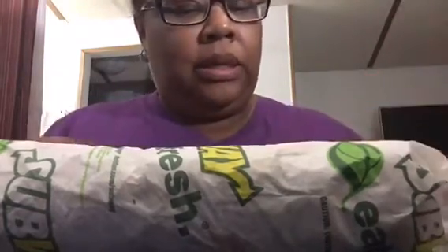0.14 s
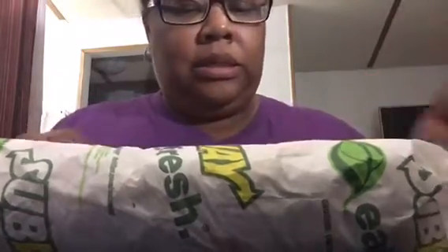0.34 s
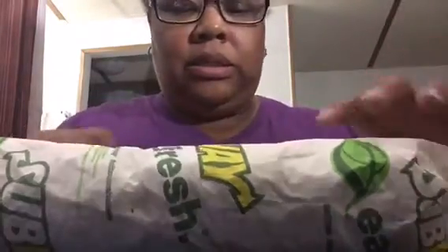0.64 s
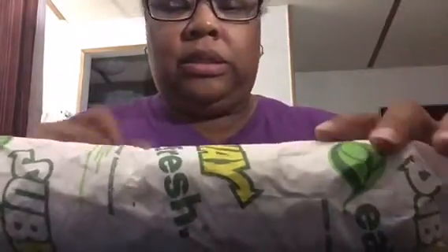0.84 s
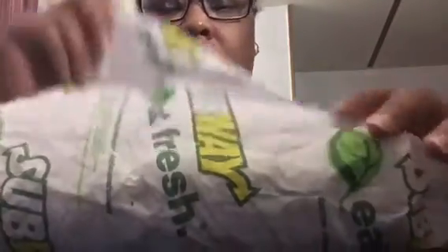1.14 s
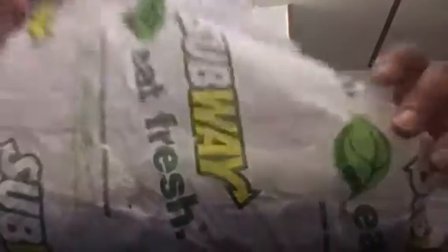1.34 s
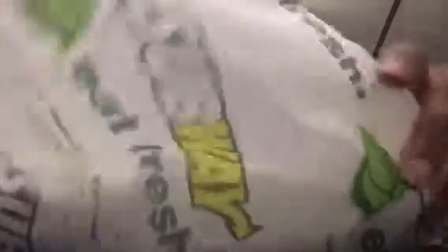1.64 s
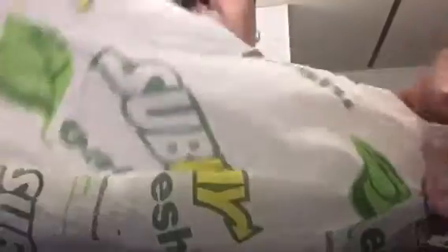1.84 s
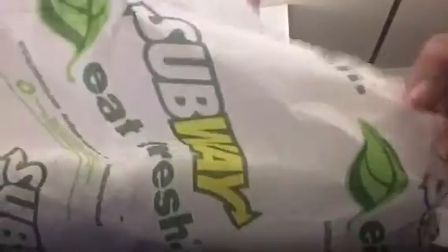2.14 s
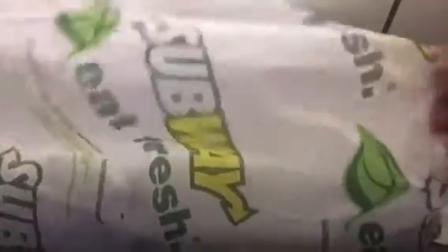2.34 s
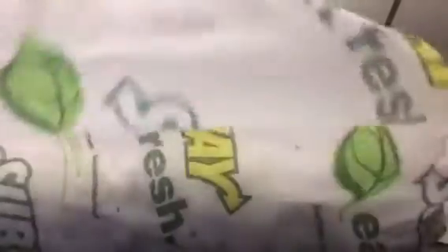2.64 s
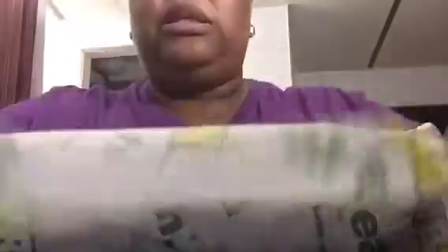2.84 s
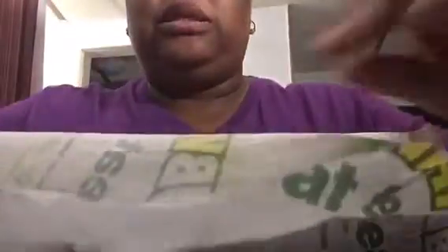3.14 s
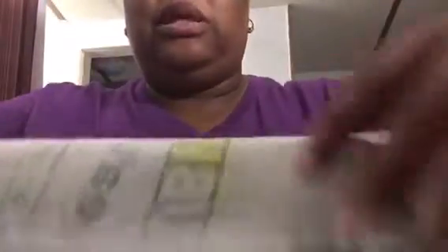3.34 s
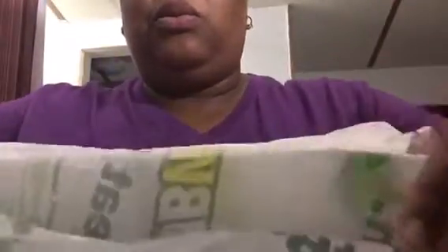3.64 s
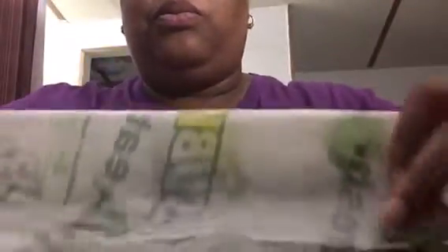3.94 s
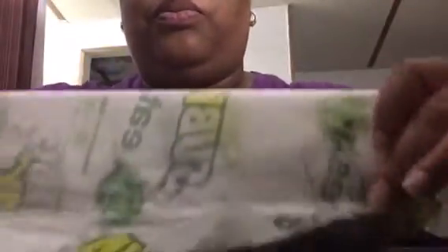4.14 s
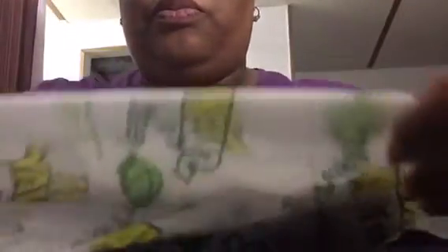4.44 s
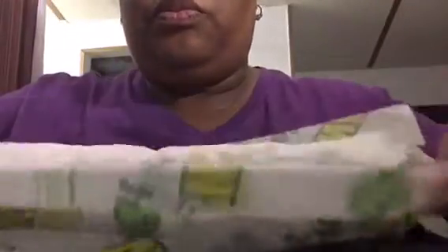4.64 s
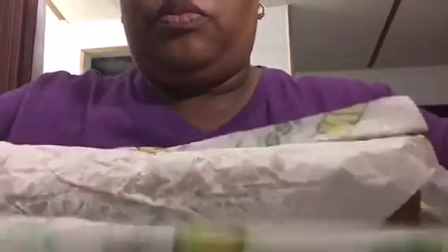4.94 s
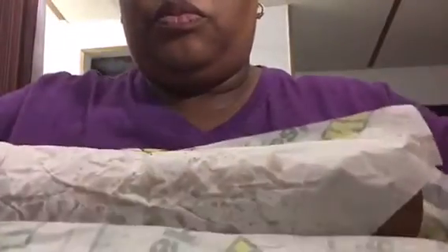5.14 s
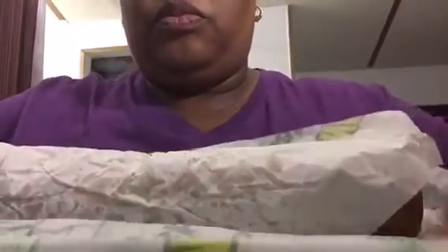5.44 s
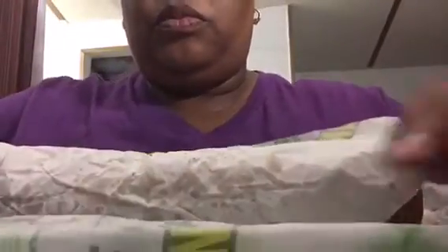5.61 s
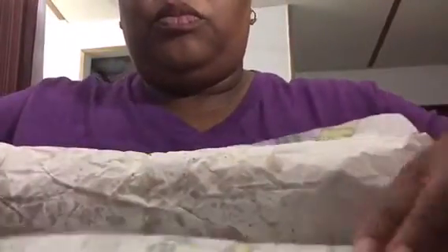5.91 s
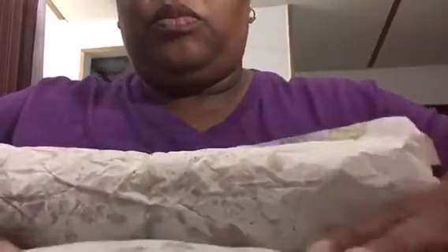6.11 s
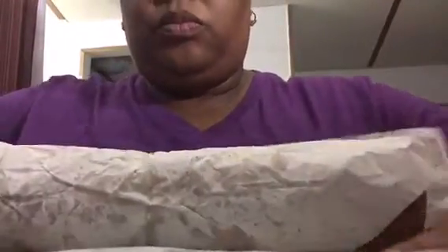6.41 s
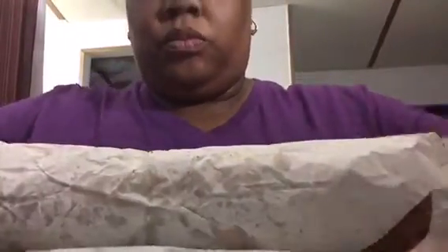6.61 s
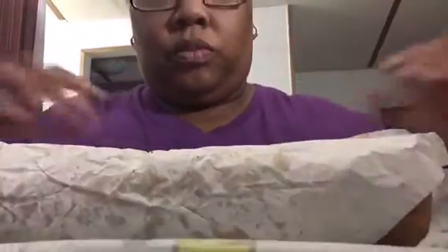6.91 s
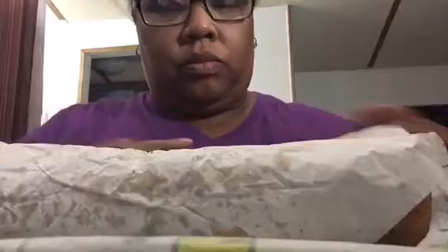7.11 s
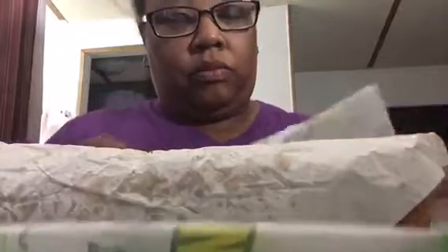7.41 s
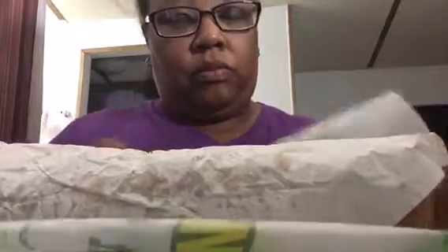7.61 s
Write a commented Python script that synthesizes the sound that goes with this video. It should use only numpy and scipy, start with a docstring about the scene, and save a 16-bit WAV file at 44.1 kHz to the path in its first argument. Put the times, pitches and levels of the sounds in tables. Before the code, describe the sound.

Paper wrapper handling, close and dry with a short small-room reflection: light rustling at first, growing into loud, dense crinkles with crisp ticks and snapping creases. Soft thuds of hands and sandwich come between. The bursts are uneven, with brief lulls, almost stopping near the end, before a few scraping, rustling strokes flatten the sheet on the table. A faint low mains hum and room rumble continue throughout.

```python
"""A sandwich is unwrapped by hand on a table in a small room, close to the microphone, over hum and rumble.
First the paper drags under the roll; then each move of the hands rustles, as swarms of tiny buckles
and flipping facets. Bumps thud as damped swings, creases tick and crackle, panels pop and ring.
After 6.5 s the handling thins and grows faint; from about 7.2 s the paper is smoothed flat on the table.
Short reflections off table and paper and a longer, fainter tail from the walls, all slightly dulled, surround it."""
import sys
import numpy as np
from scipy import signal
from scipy.fft import rfft, irfft
from scipy.io import wavfile
from scipy.ndimage import uniform_filter1d

SR = 44100
rng = np.random.default_rng(int(sys.argv[2]) if len(sys.argv) > 2 else 0)


def store_wav(level_fs):
    """Save 16-bit WAV to argv[1]."""
    pcm = np.round(np.clip(np.atleast_2d(level_fs), -1, 1) * 32767)
    wavfile.write(sys.argv[1], SR, pcm.T.astype(np.int16))


N = 342480
TIME = np.arange(N) / SR  # s
HALF_SECOND = TIME[:SR // 2]
CUTOFF_HZ = 15900  # top of the microphone's range

# spectrum of the quiet room: [f/Hz, relative level/dB per Hz]
ROOM_SPECTRUM = [(30, -11), (64, 2), (130, -4), (200, -20), (500, -25.5), (4000, -51), (16000, -45)]
ROOM_RMS_DB = -48  # before the microphone
HUM_HZ, HUM_RMS_DB = 60.5, -50

# moves of the hands that pull, lift or flatten the paper; wide panels add body, tight creases crispness:
# [start t/s, length t/s, level at the start/dB, swell over the length/dB, body/dB, crispness/dB]
HAND_MOVES = [(0.006, 0.14, -31, -3.5, 0, 4), (0.184, 0.34, -45, 2, 2, -1), (0.601, 0.44, -41.5, -7, 5, 0),
              (0.949, 0.38, -37, -7, 2.5, -1), (1.323, 0.47, -33.5, 1.5, -1.5, -4.5),
              (1.794, 0.32, -34, -11, -1.5, 1.5), (2.212, 0.26, -33, 8.5, -0.5, 0),
              (2.591, 0.024, -27.5, 7, 0, 0), (2.723, 0.27, -33, 3.5, -2, -0.5),
              (3.124, 0.088, -50.5, 0.5, -4, 10), (3.346, 0.1, -43, 13.5, 1.5, -3.5),
              (3.558, 0.42, -30.5, 2.5, -4.5, -5), (4.012, 0.26, -28, 0, -2, -2.5),
              (4.348, 0.32, -28, 1, -0.5, 0), (4.709, 0.37, -33, 4, -4, 0.5),
              (5.129, 0.26, -31, -3, -6.5, 4.5), (5.444, 0.073, -41.5, 1, -4, -4),
              (5.614, 0.09, -55.5, 8.5, 2.5, 4), (5.757, 0.064, -34, 8, -4.5, 1),
              (5.942, 0.18, -27.5, -11.5, -0.5, 7), (6.116, 0.033, -29, 4, -1.5, 7),
              (6.23, .27, -33.5, 2, 0.5, 6), (6.596, 0.049, -41, 4, 3, 13.5),
              (6.75, 0.31, -57.5, -8, 14, -7), (7.132, 0.037, -42.5, -7, 8.5, 4.5),
              (7.225, 0.29, -39.5, 1, 8, 5.5), (7.557, 0.3, -32.5, -6, 8.5, 4)]
# a move takes hold quickly and lets go more slowly; the paper then settles faintly
ATTACK_DB_PER_S, RELEASE_DB_PER_S = 470, 183.5
SETTLE_DB, SETTLE_DB_PER_S = -24, 39

# the paper's voice: [f/Hz, relative level/dB per Hz]
SHEET_SPECTRUM = [(50, -16), (135, 1.5), (240, -7.5), (420, -2.5), (760, -2.5), (1130, 2.9), (2000, -0.5),
                  (3200, 0.75), (4700, -1.5), (6000, -4), (7800, -12.5), (10500, -12.5), (15500, -17.5)]
# paper dragged over the table, first under the roll, at the end smoothed flat: [t/s, level/dB]
DRAG_LEVELS = [(.04, -37.5), (.19, -43), (.3, -88), (7.15, -89), (7.22, -38.5), (7.52, -43), (7.61, -27.5),
               (7.76, -43.5)]
# resonances that the dragging rings in: [f/Hz, width f/Hz, relative level/dB]
TABLE_MODES = [(266, 19, 7.5), (880, 360, -5.5), (1140, 140, -2)]
# dull contacts of hands, sandwich and loose flaps: [t/s, peak level/dB, f/Hz, t60 t/s]
DULL_BUMPS = [(.074, -34, 134, 0.08), (2.433, -20.5, 99, 0.049), (2.656, -28, 54, 0.074),
              (3.301, -33.5, 289, 0.079), (3.463, -21.5, 80.5, 0.02), (4.599, -21, 596, 0.016),
              (4.741, -12.5, 654, 0.004), (6.183, -18.5, 158, 0.037), (7.35, -20, 76.4, 0.055),
              (7.516, -28.5, 135, 0.1)]
# creases giving way in a short crackle: [t/s, strength level/dB, centre f/Hz, crackle t60 t/s]
CREASE_SNAPS = [(0.078, -18, 2600, 0.018), (0.289, -23.5, 2010, 0.036), (0.597, -24, 2300, 0.057),
                (0.954, -20, 2840, 0.043), (1.132, -22.5, 2830, 0.019), (1.595, -17, 3030, 0.018),
                (2.249, -18.5, 5000, 0.022), (2.327, -13.5, 2760, .03), (2.389, -16, 3640, 0.018),
                (2.436, -8, 2440, 0.043), (2.459, -10.5, 2430, 0.02), (2.487, -14.5, 2560, 0.014),
                (2.746, -19, 2900, 0.022), (3.318, -23.5, 2630, 0.044), (3.408, -18.5, 3570, 0.029),
                (3.602, -13.5, 2550, 0.033), (3.792, -14.5, 3200, 0.028), (3.812, -16, 3020, 0.024),
                (4.134, -14.5, 3160, 0.017), (4.598, -15, 2280, 0.0083), (4.741, -12, 1420, 0.011),
                (5.405, -13.5, 3260, 0.033), (5.797, -11.5, 3960, 0.037), (5.92, -14, 6060, 0.0037),
                (6.635, -20.5, 2520, 0.015), (7.344, -12.5, 1500, 0.03)]
# single panels popping through and ringing: [t/s, strength level/dB, f/Hz]
PANEL_POPS = [(0.119, -22.5, 3400), (0.1982, -22, 2800), (0.3185, -28.5, 4170), (0.34, -28.5, 3060),
              (0.621, -30.5, 6700), (0.7325, -26, 2880), (1.08, -27.5, 3400), (1.218, -27, 2630),
              (1.267, -28, 837), (1.3032, -25, 860), (1.358, -26, 2700), (1.4137, -19, 4170),
              (1.671, -15, 2660), (1.6785, -23, 2850), (1.693, -21, 2600), (1.7527, -23, 2600),
              (1.807, -24, 2630), (2.108, -28.5, 1770), (2.522, -22, 1984), (2.534, -22.5, 3200),
              (2.5968, -19, 2170), (2.812, -20.5, 2870), (2.9067, -14.5, 3200), (2.955, -16.5, 4250),
              (3.0084, -25, 2620), (3.1495, -29, 1880), (3.2646, -29, 2300), (3.4487, -14.5, 1450),
              (3.575, -21, 1910), (3.644, -17, 2960), (3.664, -23, 2900), (3.7263, -20.5, 2080),
              (3.8335, -18.5, 2580), (3.895, -20.5, 2250), (4.1785, -18, 2640), (4.2405, -18.5, 2600),
              (4.2733, -19.5, 2930), (4.5154, -19, 2320), (4.522, -17.5, 3140), (4.6746, -25, 1960),
              (4.9403, -20.5, 2670), (5.221, -17, 2880), (5.311, -21, 2330), (5.4338, -22, 2500),
              (5.4515, -21, 2240), (5.5137, -25.5, 3320), (5.6797, -33, 1000), (5.7565, -23.5, 3470),
              (5.811, -21, 2140), (6.1129, -14, 1420), (6.1127, -13.5, 3440), (6.156, -19, 2890),
              (6.7067, -34, 2770), (6.7247, -31.5, 3800), (6.7914, -36, 2790), (6.821, -47, 1350),
              (6.862, -48, 4000), (6.9255, -38, 3460), (7.0407, -35, 4020), (7.4325, -20.5, 3130)]
# narrow dips in the microphone's response: [f/Hz, width f/Hz, share taken out/dB]
MICROPHONE_DIPS = [(5010, 270, -7.5), (10500, 880, -7)]


def from_db(db):
    """Decibels to gain."""
    return 10 ** (np.asarray(db) / 20)


def rms_one(x):
    """Scale to unit power."""
    return x / np.sqrt(np.mean(x ** 2) + 1e-20)


def energy_one(x):
    """Scale to unit energy."""
    return x / np.linalg.norm(x)


def drift(rate):
    """Smooth chance with about `rate` new values a second; rms 1."""
    knots = rng.standard_normal(N // 2)
    return rms_one(np.interp(TIME * rate, np.arange(len(knots)), knots))


def band(x, low_hz, high_hz):
    """Gentle causal band-pass."""
    edges = [low_hz, min(high_hz, CUTOFF_HZ)]
    return signal.sosfilt(signal.butter(1, edges, "band", fs=SR, output="sos"), x + 1e-18)


def below(x, hz):
    """The part of x under a frequency; x minus it is the part above."""
    return signal.sosfiltfilt(signal.butter(2, hz, fs=SR, output="sos"), x)


def resonance(x, hz, width_hz, gain_db):
    """One damped resonance."""
    return from_db(gain_db) * band(x, hz - width_hz / 2, hz + width_hz / 2)


def coloured(x, spectrum, size=8192):
    """Minimum-phase filter of unit energy: clicks take on the spectrum and stay sharp."""
    hz, db = np.transpose(spectrum)
    bins = np.fft.rfftfreq(size, 1 / SR)
    log_gain = np.log(from_db(np.interp(np.log(bins + 1), np.log(hz), db)))
    # keeping only the causal half of the cepstrum gives minimum phase
    cepstrum = irfft(log_gain)[:size // 2]
    response = irfft(np.exp(rfft(2 * cepstrum, size)))
    return signal.fftconvolve(x, energy_one(response))[:N]


def fade(t60):
    """Half a second of exponential decay."""
    return from_db(-60 * HALF_SECOND / t60)


def dying_noise(t60):
    """A fading noise burst of unit energy."""
    return energy_one(rng.standard_normal(SR // 2) * fade(t60))


def add(out, s, sound):
    """Mix a sound in at time s."""
    at = max(round(s * SR), 0)
    out[at:at + len(sound)] += sound[:len(out) - at]


def room_tone():
    """The quiet room: low rumble as shaped noise, with a mains hum as one sine."""
    hum = from_db(HUM_RMS_DB) * np.sqrt(2) * np.sin(2 * np.pi * HUM_HZ * TIME)
    rumble = coloured(rng.standard_normal(N), ROOM_SPECTRUM)
    return from_db(ROOM_RMS_DB) * rumble + hum


def handling():
    """Rustle level, body and crispness in dB; moves attack, swell and release, and overlaps add in power."""
    power, body, crisp = 1e-12, 0, 0
    for start, length, level_db, swell_db, body_db, crisp_db in HAND_MOVES:
        before = np.maximum(start - TIME, 0)
        after = np.maximum(TIME - start - length, 0)
        release_db = np.maximum(-RELEASE_DB_PER_S * after, SETTLE_DB - SETTLE_DB_PER_S * after)
        hold_db = level_db + swell_db * np.clip((TIME - start) / length, 0, 1)
        move_db = hold_db - ATTACK_DB_PER_S * before + release_db
        move = from_db(np.maximum(move_db, -200)) ** 2
        # the louder move decides the tone
        power, body, crisp = power + move, body + move * body_db, crisp + move * crisp_db
    return 10 * np.log10(power), body / power, crisp / power


def buckles(effort_db, per_s, size_spread_db, clump_db, slide_db, size=1000):
    """Buckle avalanches over sliding friction, at even power; light handling leaves lone ticks."""
    clumps = from_db(clump_db * drift(150))
    rate = per_s * from_db(.5 * effort_db) * clumps
    sizes = from_db(size_spread_db * np.minimum(rng.exponential(1, N), 3.5))
    sizes = sizes * np.sign(rng.standard_normal(N))
    clicks = rms_one(sizes * (rng.random(N) < rate / SR))
    sliding = from_db(slide_db + 0.17 * effort_db) * clumps * rng.standard_normal(N)
    force = clicks + sliding
    power = uniform_filter1d(uniform_filter1d(force ** 2, size), size)
    return force / np.sqrt(power + 1e-9)


def flip(hz, cycles):
    """A facet of paper turning inside out: a few swings that swell and die at once; unit energy."""
    phase = hz * TIME[:SR // 50]
    return energy_one(phase * np.sin(2 * np.pi * phase) * from_db(-60 * phase / cycles))


def facets(level_db, per_s, centre_hz, octaves, spread_db, cycles, overtone_db, busy_db, thinning):
    """Facets flip at random, each of two pitches; under light handling they are fewer and stand out more."""
    out, count = np.zeros(N), int(per_s * N / SR)
    share = from_db(thinning * np.minimum(level_db - busy_db, 0))
    for when, size, width, height, second, chance in rng.random((count, 6)):
        at = int(when * N)
        if chance < share[at]:
            hz = min(centre_hz * 2 ** (octaves * (width - height)), CUTOFF_HZ / 2)
            strength_db = level_db[at] - spread_db * np.log(size + 0.14)  # many small ones, few large
            overtone = from_db(overtone_db) * flip(hz * 2 ** (.5 + second), cycles)
            swing = energy_one(flip(hz, cycles) + overtone)
            add(out, at / SR, from_db(strength_db) / np.sqrt(share[at]) * swing)
    return out


def grainy(x, spread_db, patchy_db):
    """Buckles shake a register of the sheet unevenly, and each fold favours other registers."""
    return x * rms_one(from_db(spread_db * drift(600) + patchy_db * drift(60)))


def rustle(level_db, body_db, crisp_db, body_hz, middle_hz, crisp_hz):
    """Buckles sound through the sheet and facets pop out of it; bass and treble shift as the folds move."""
    effort_db = level_db - np.median(level_db)
    force = buckles(effort_db, per_s=2000, size_spread_db=5, clump_db=3, slide_db=0.5)
    sheet = coloured(from_db(level_db - 1.42) * force, SHEET_SPECTRUM)
    sheet = sheet + facets(level_db + 13.5, per_s=190, centre_hz=2130, octaves=1.54, spread_db=6.5,
                           cycles=5.6, overtone_db=-4, busy_db=-32, thinning=.6)
    body, to_middle, to_crisp = [below(sheet, hz) for hz in (body_hz, middle_hz, crisp_hz)]
    registers = [from_db(body_db) * body,
                 to_middle - body,
                 to_crisp - to_middle,
                 from_db(crisp_db) * (sheet - to_crisp)]
    return sum(grainy(register, spread_db=3.0, patchy_db=1.5) for register in registers)


def smoothing(rough_db):
    """Paper dragged over the table top: roughly flickering friction noise rings in a few resonances."""
    level_db = np.interp(TIME, *np.transpose(DRAG_LEVELS))
    friction = rng.standard_normal(N) * from_db(rough_db * drift(120))
    ringing = sum(resonance(friction, *mode) for mode in TABLE_MODES)
    return from_db(level_db) * rms_one(ringing)


def bumps(rise_s):
    """Soft contacts: damped sine swings with a rounded onset."""
    out = np.zeros(N)
    for s, peak_db, hz, t60 in DULL_BUMPS:
        onset = 1 - np.exp(-HALF_SECOND / rise_s)
        swing = np.sin(2 * np.pi * hz * HALF_SECOND) * fade(t60) * onset
        add(out, s, from_db(peak_db) * swing / np.abs(swing).max())
    return out


def snaps(cycles, tick_db, crackle_per_s, sizzle_db, build_share):
    """A crease flips with a tick, sharper for small panels, and sets off a dying crackle in its neighbours."""
    out = np.zeros(N)
    for s, strength_db, hz, t60 in CREASE_SNAPS:
        tick = from_db(tick_db) * (hz / 3000) ** 3.9 * flip(13600, cycles)
        burst = dying_noise(t60) * (1 - np.exp(-HALF_SECOND / (build_share * t60)))
        main = band(band(burst, hz * 0.35, hz * 1.47), 320, 13100)
        sizzle = from_db(sizzle_db) * hz / 3000 * band(burst, 8400, 16400)
        # long crackles hold most of the energy
        snap = np.sqrt(crackle_per_s * t60) * energy_one(main + sizzle)
        add(snap, 0, flip(hz, cycles) + tick)
        add(out, s, from_db(strength_db) * energy_one(snap))
    return out * np.sqrt(SR / 1000)  # strength is the level the snap would have if packed into a millisecond


def pops(cycles, overtone_ratio, overtone_db, tick_db, tick_hz, shiver_db, shiver_t60):
    """A panel pops through with a tick and rings in two modes; the sheet around it shivers briefly."""
    out = np.zeros(N)
    for s, strength_db, hz in PANEL_POPS:
        overtone_hz = hz * overtone_ratio * rng.uniform(.85, 1.15)
        overtone = from_db(overtone_db) * flip(overtone_hz, cycles)
        tick = from_db(tick_db) * hz / 3000 * flip(tick_hz, 2.6)
        panel = energy_one(flip(hz, cycles) + overtone + tick)
        pop = from_db(shiver_db) * energy_one(band(dying_noise(shiver_t60), hz / 2, hz * 2))
        add(pop, 0, panel)  # the panel joins the shiver
        add(out, s, from_db(strength_db) * pop)
    return out * np.sqrt(SR / 1000)  # strength is the level the panel would have if packed into a millisecond


def room(x, near_t60, near_db, far_t60, far_db, wall_hz, shifts_per_s, count):
    """Table and paper reflections, then a longer, fainter wall tail, shifting as sound wanders over the sheet."""
    shares = np.array([drift(shifts_per_s) for _ in range(count)])
    out = x
    for share in shares / np.linalg.norm(shares, axis=0):
        echo = np.zeros(SR // 2)
        add(echo, .001, from_db(near_db) * dying_noise(near_t60))
        add(echo, .008, from_db(far_db) * dying_noise(far_t60))
        # one band slightly dulls reflections and tail alike
        out = out + signal.fftconvolve(share * x, band(echo, 88, wall_hz))[:N]
    return out


def scene():
    """Paper and bumps in the room; rustle, snaps and pops also wake the boxy ring of the table."""
    level_db, body_db, crisp_db = handling()
    paper = rustle(level_db, body_db, crisp_db, body_hz=1310, middle_hz=2500, crisp_hz=7130)
    paper = paper + snaps(cycles=3.3, tick_db=-17.0, crackle_per_s=180, sizzle_db=-15, build_share=0.12)
    paper = paper + pops(cycles=6.3, overtone_ratio=1.63, overtone_db=-2.5, tick_db=-29, tick_hz=9700,
                         shiver_db=-4.5, shiver_t60=0.0085)
    boxy_ring = resonance(paper, hz=264.5, width_hz=35, gain_db=5.0)
    close = paper + boxy_ring + smoothing(rough_db=5.5) + bumps(rise_s=0.0015)
    heard = room(close, near_t60=0.031, near_db=-11.0, far_t60=0.19, far_db=-15.0, wall_hz=7040,
                 shifts_per_s=9, count=6)
    return (heard + room_tone())[None]


def record(dry):
    """The microphone drops the deepest bass and has two dips in the treble; the top is cut steeply."""
    heard = dry - sum(resonance(dry, *dip) for dip in MICROPHONE_DIPS)
    heard = signal.sosfilt(signal.butter(2, 36, "high", fs=SR, output="sos"), heard)
    return signal.sosfilt(signal.ellip(10, .2, 70, CUTOFF_HZ, fs=SR, output="sos"), heard)


dry = scene()
out = record(dry)
store_wav(out)
```